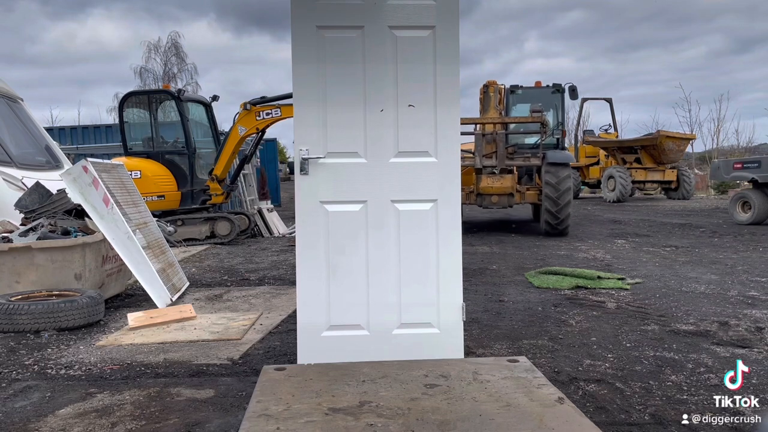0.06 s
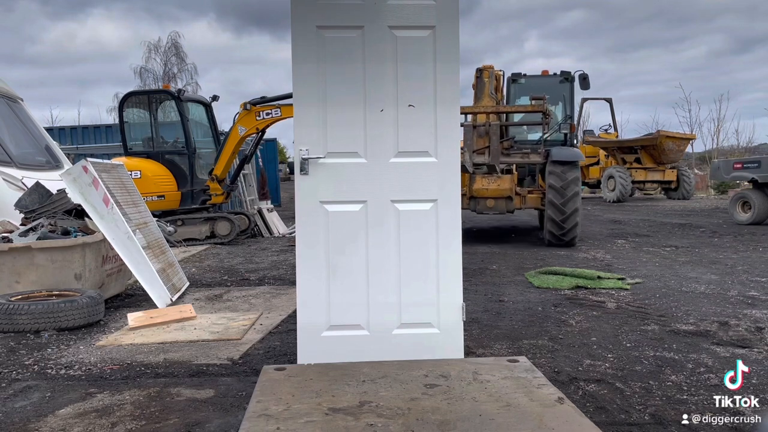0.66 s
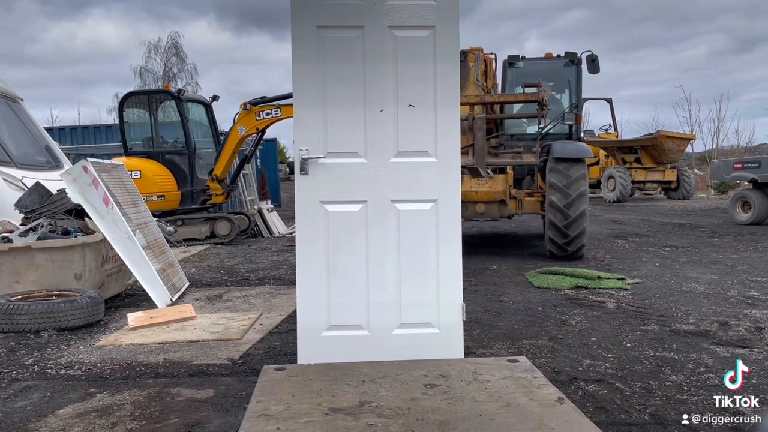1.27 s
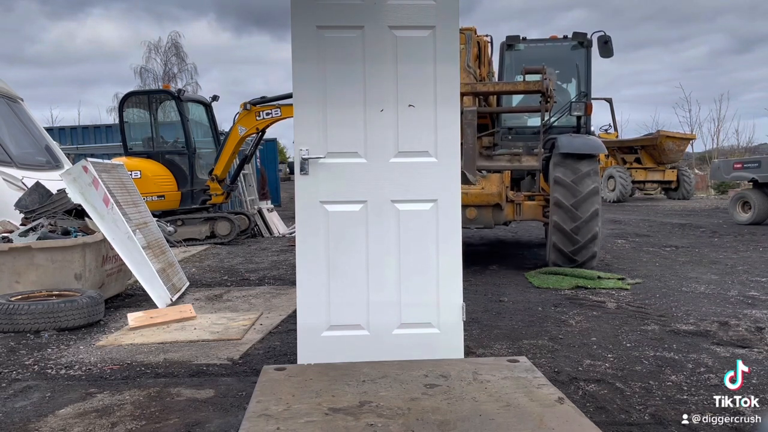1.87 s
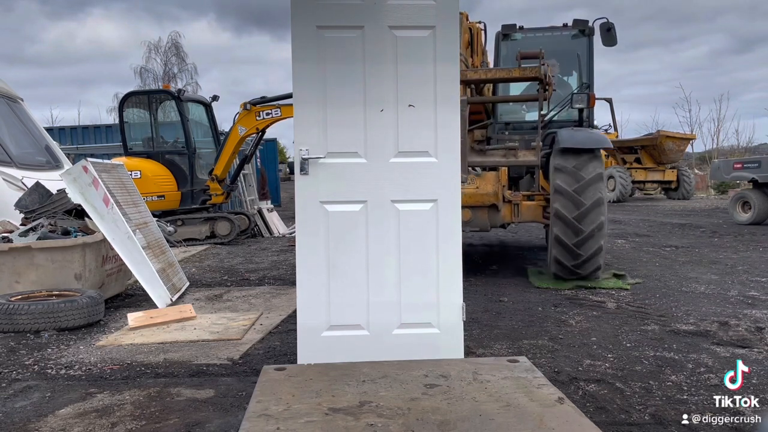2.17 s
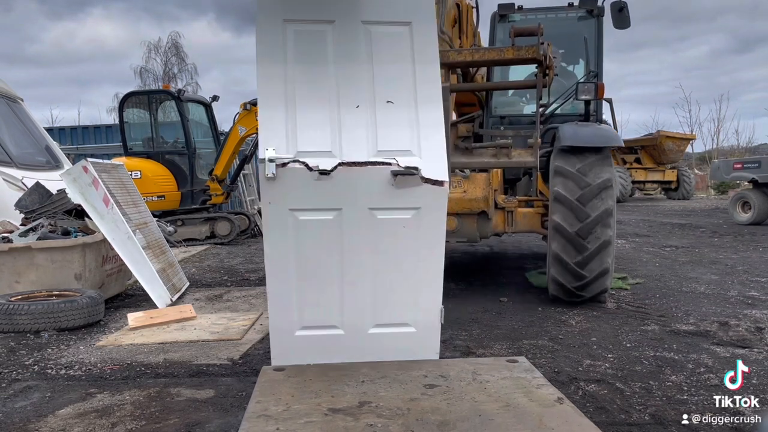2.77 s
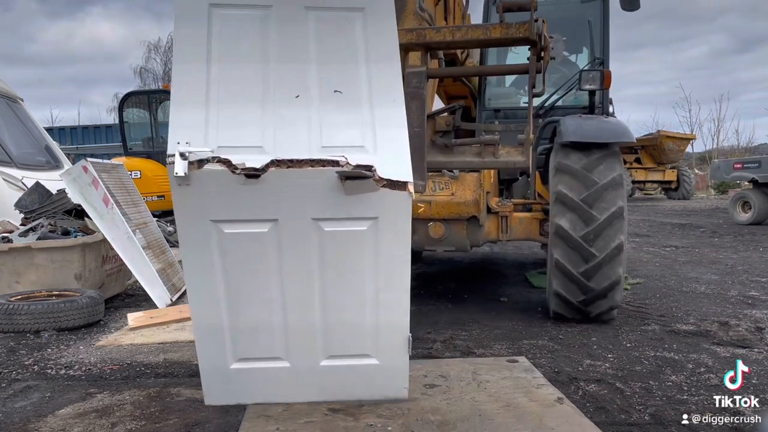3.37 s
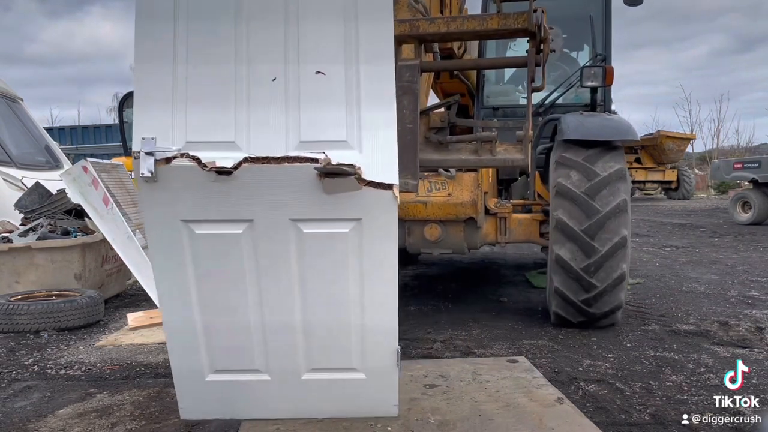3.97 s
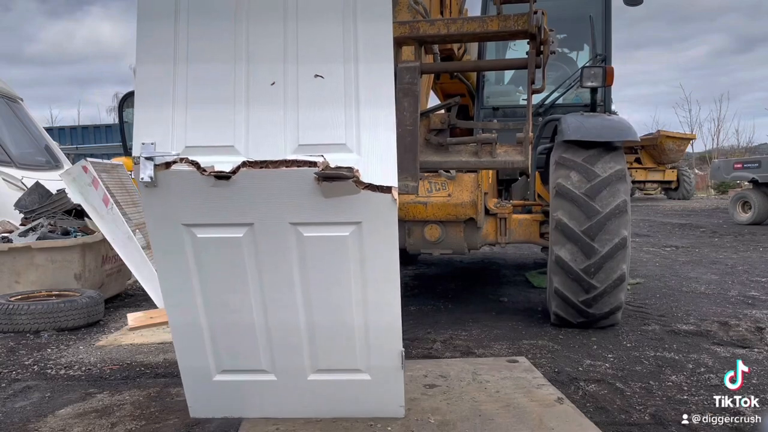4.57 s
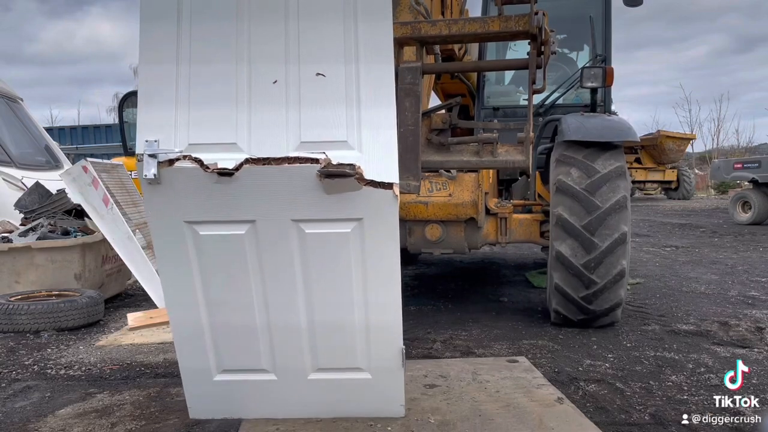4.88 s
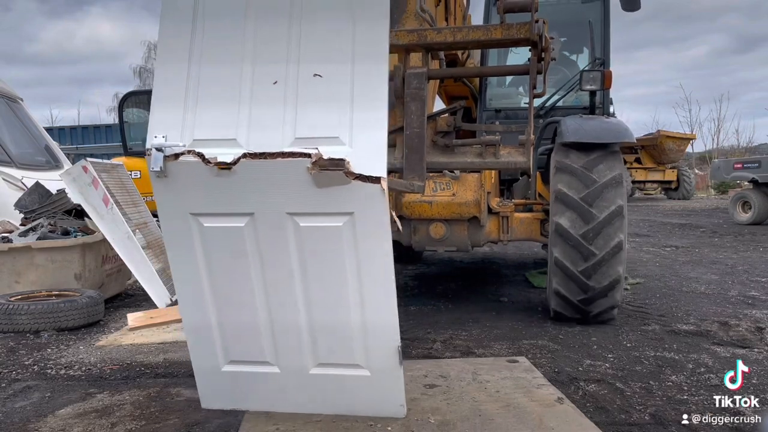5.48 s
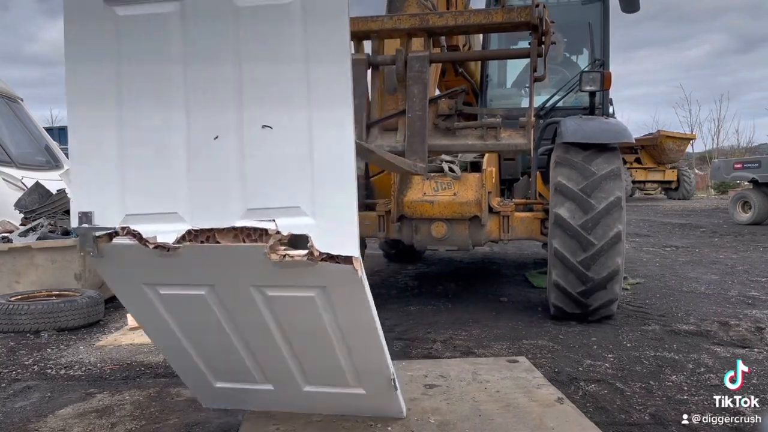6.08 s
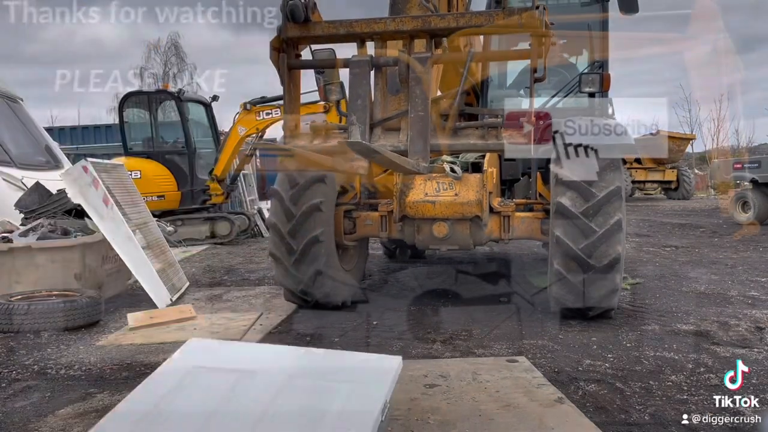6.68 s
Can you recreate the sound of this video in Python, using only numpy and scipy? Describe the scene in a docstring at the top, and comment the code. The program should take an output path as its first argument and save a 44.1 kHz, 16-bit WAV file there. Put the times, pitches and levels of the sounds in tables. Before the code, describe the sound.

A diesel loader rolls toward the microphone across a yard, growing louder, its revs rising and wavering twice with a low hum. Its loose steel forks rattle and clink from about 0.6 to 2.2 seconds. At 2.4 seconds a hollow wooden door starts to break close by, with a ragged cluster of thumps and cracks, the loudest at 2.6 seconds overloading the microphone. Splintering, crunching and further knocks run on until about 3.6 seconds as the engine sinks to an idle. The broken door drags over the ground in quieter, gritty strokes at around 3.9, 5.1 and 6.3 seconds, with ticking splinters, hollow knocks and a small metal clink near 5.8. At 6.4 seconds the door knocks and cracks again, then slams flat on a steel plate at 6.6, very loud, bouncing briefly as the plate rings. The blows leave a short outdoor echo.

```python
"""A diesel loader, revs wavering, rolls across a yard toward the microphone, its loose forks rattling.
Close by, it pushes them through a hollow wooden door: fibres crack, the skins knock, the core thumps.
While the engine idles the door hangs on the forks and drags its edge over the ground in three strokes,
then slams flat on a steel plate, which rings. Machines and sheds scatter the door's sound back,
and the loudest blows overload the microphone."""
import sys
import numpy as np
from scipy import signal
from scipy.fft import rfft, irfft, next_fast_len
from scipy.io import wavfile
from scipy.ndimage import uniform_filter1d, map_coordinates

SR = 44100
rng = np.random.default_rng(int(sys.argv[2]) if len(sys.argv) > 2 else 0)


def generate_wav(signal):
    """Clip the signal to [-1, 1] and save it as 16-bit WAV at the path in sys.argv[1]."""
    frames = np.transpose(np.atleast_2d(signal))
    scaled = np.clip(frames, -1, 1) * 32767
    pcm = np.round(scaled).astype(np.int16)
    wavfile.write(sys.argv[1], SR, pcm)


N = 297234

IDLE_HZ = 26  # firing rate
START_M, STOP_M, STOP_S = 12, 3.6, 3.47  # the loader's distance from the microphone, and when it stops
# The engine revs twice, lugs against the door, then idles. Each row: time in seconds, firing rate in Hz.
REVS = [(0.0, 40.05), (0.12, 44.8), (0.55, 46.07), (0.82, 51), (1.03, 42.9), (1.18, 40.54), (1.37, 47.08),
        (1.51, 49.94), (1.67, 47.85), (1.98, 39.5), (2.25, 32.24), (2.82, 24.37), (2.99, 23.43),
        (4.21, 21.06), (4.53, 25.31), (6.4, 26.73)]
# Short single-tone rings: the forks' loose pins and links, then, in the last row, a knock on the door.
# Each row: start in seconds, level in dB, frequency in Hz, t60 in seconds.
SHORT_RINGS = [(0.405, -66, 6196, .16), (0.587, -49, 3200, 0.14), (1.008, -43, 1940, 0.11),
               (1.331, -49, 3025, .12), (1.331, -56, 3526, 0.15), (1.49, -42, 2990, .12),
               (1.737, -36, 3200, .15), (1.778, -37, 3130, 0.11), (2.15, -42.5, 1420, 0.18),
               (3.536, -16, 1235, 0.037)]
# The hollow door's own modes. Each row: frequency in Hz, level in dB, t60 in seconds.
PANEL_MODES = [(203.5, 1.5, 0.213), (262.3, 3, 0.22), (377.6, 2.5, 0.25), (456.5, 3, 0.18),
               (497, 2.5, 0.084), (625.1, 1.5, 0.15), (753.6, -5, 0.41), (804.6, -6, .2), (887, -6, 0.3),
               (1025.6, -5.5, 0.17), (1235, -12, 0.24), (1393, -17, 0.1), (1816, -16.5, 0.18),
               (2490, -15.5, 0.28)]
# The dull groan of a rubbing edge. Each row: frequency in Hz, level in dB.
GROAN_SPECTRUM = [(65, -32.5), (120, -6), (165, 1), (215, -1.5), (330, 4), (458, -12), (587, -3),
                  (644, -17), (736, -2), (896, -16), (1300, -23.5), (1690, -56.5), (2860, -120)]
# The hanging door drags over the ground. Each row: start, attack, hold and release in seconds,
# then depth of the swell, groan level and crunch level in dB.
DRAG_STROKES = [(3.89, 0.12, 0.17, 0.38, 10, -39.5, -47), (5.079, 0.3, 0.19, 0.34, 12.5, -34, -40),
                (6.259, 0.29, 0.045, 0.018, 42, -28.5, -30.5)]


def amp(db):
    """Decibels as a gain."""
    return 10 ** (np.asarray(db) / 20)


def unit(x):
    """x scaled to rms 1."""
    return x / np.sqrt(np.mean(x ** 2) + 1e-20)


def struck(x):
    """A hit scaled to rms 1 over its first 20 ms."""
    return x / np.sqrt(np.mean(x[:880] ** 2) + 1e-20)


def along(points, hz):
    """The value at hz between (Hz, value) points, on a log axis."""
    knots_hz, values = np.transpose(points)
    return np.interp(np.log(hz + 1), np.log(knots_hz + 1), values)


def during(start, end, fade):
    """1 from start to end, fading outside; all in seconds."""
    return np.interp(np.arange(N) / SR, [start - fade, start, end, end + fade], [0, 1, 1, 0])


def wobble(rate, size=N):
    """A smooth random curve, rate knots a second."""
    knots = rng.standard_normal(int(size * rate / SR) + 4)
    return map_coordinates(knots, [np.arange(size) * rate / SR])


def filtered(x, response):
    """x times a complex response of frequency."""
    size = next_fast_len(len(x) + 8192)
    return irfft(rfft(x, size) * response(np.fft.rfftfreq(size, 1 / SR)), size)[:len(x)]


def coloured(x, spectrum, size=4096):
    """x through a causal filter with the gain of the (Hz, dB) points."""
    gain = amp(along(spectrum, np.fft.rfftfreq(size, 1 / SR)))
    cepstrum = irfft(np.log(np.maximum(gain, 1e-6)))
    fold = np.r_[1, np.full(size // 2 - 1, 2), 1, np.zeros(size // 2 - 1)]  # to minimum phase
    return signal.fftconvolve(x, irfft(np.exp(rfft(cepstrum * fold))))[:len(x)]


def resonant(x, peaks):
    """x through (Hz, width in Hz, dB) resonances of alternating sign."""
    return filtered(x, lambda f: sum((-1) ** k * amp(db) * 1j * f * width
                                     / (hz * hz - f * f + 1j * f * width)
                                     for k, (hz, width, db) in enumerate(peaks)))


def burst(t60, tail_db, tail_t60):
    """Noise that dies fast, over a slower tail."""
    t = np.arange(SR // 3) / SR
    return rng.standard_normal(len(t)) * (amp(-60 * t / t60) + amp(tail_db - 60 * t / tail_t60))


def jolt(t60, tail_db, tail_t60, edge):
    """A sudden impulse of height edge, then the rattle that it starts."""
    rattle = burst(t60, tail_db, tail_t60)
    rattle[0] += edge
    return rattle


def ring(modes, rise_s=0.0005):
    """Decaying sines from (Hz, dB, t60) modes, with a brief soft rise."""
    t = np.arange(SR // 3) / SR
    rise = 1 - np.exp(-(t / rise_s) ** 2)
    return rise * sum(amp(db - 60 * t / t60) * np.sin(2 * np.pi * (hz * t + rng.random()))
                      for hz, db, t60 in modes)


def grains(rate, spread_db):
    """Random impulses, rate a second, a few much larger than the rest."""
    sizes = amp(spread_db * np.minimum(rng.exponential(size=N), 4))
    return (rng.random(N) < rate / SR) * sizes * rng.choice([-1, 1], N)


def snaps(rate, spread_db, low_hz=900, high_hz=14000, life_cycles=1.8):
    """Tiny random snaps, rate a second, each with its own pitch and size."""
    when, pitch, chance = rng.random((int(rate * N / SR), 3)).T[:, :, None]
    hz = low_hz * (high_hz / low_hz) ** pitch
    size = hz * amp(spread_db * np.minimum(-np.log(1 - chance), 4))  # higher snaps: shorter but taller
    age = np.arange(300)
    cycles = hz * age / SR
    pings = size * np.exp(-cycles / life_cycles) * np.sin(2 * np.pi * cycles)
    positions = (when * N).astype(int) + age
    return unit(np.bincount(positions.ravel(), pings.ravel(), N)[:N])


def add(track, start, sound):
    """Mix a sound in at start seconds."""
    part = track[round(start * SR):][:len(sound)]
    part += sound[:len(part)]


def nearness_db():
    """The loader grows louder as it nears the microphone at an even pace; 0 dB where it stops."""
    distance_m = np.interp(np.arange(N) / SR, [0, STOP_S], [START_M, STOP_M])
    return 20 * np.log10(STOP_M / distance_m)


def engine():
    """Exhaust tones, roar and clatter follow revs, throttle and distance, over a steady low rumble."""
    # Exhaust orders 1 to 3. Each row: dB at idle, dB per octave of revs, dB added at full throttle.
    exhaust_orders = [(-36, 4, -3.5), (-43.5, 15, 3.5), (-40.5, 4, 0.5)]
    # The pump's faint whine. Each row: multiple of the firing rate, level in dB against the roar.
    pump_tones = [(10, -11), (15, -8)]
    # Combustion, its low roar and its hard clatter. Each row: frequency in Hz, level in dB.
    roar_spectrum = [(65, -31.5), (110, -2.5), (177, -7.5), (211, -8.5), (244, -9), (360, -11.5),
                     (450, -10), (560, -13), (645, -16), (780, -19.5), (963, -26), (1050, -15),
                     (1300, -42.5), (1690, -43), (2860, -120)]
    clatter_spectrum = [(530, -18), (900, -1.5), (1000, -7), (1080, -7.5), (1490, -6.5), (1770, -8),
                        (3000, -16.5), (3730, -23.5), (5480, -33), (7060, -40.5), (9420, -45.5),
                        (16000, -54)]
    firing_hz = np.interp(np.arange(N) / SR, *np.transpose(REVS))
    phase = 2 * np.pi * np.cumsum(firing_hz) / SR
    octaves = np.log2(firing_hz / IDLE_HZ)
    throttle = np.tanh(uniform_filter1d(np.gradient(octaves) * SR, SR // 8))  # positive as revs climb

    def gain(idle_db, octave_db, throttle_db):
        return amp(idle_db + octave_db * octaves + throttle_db * throttle)

    exhaust = sum(gain(*row) * amp(wobble(14)) * np.sqrt(2) * np.sin(k * phase + 2 * np.pi * rng.random())
                  for k, row in enumerate(exhaust_orders, 1))
    whine = sum(amp(db + 3 * wobble(25)) * np.sin(k * phase + 0.6 * wobble(40)) for k, db in pump_tones)
    firings = unit(amp(3.6 * (IDLE_HZ / firing_hz) ** 2 * np.cos(phase)))  # they merge as the revs rise
    puffs = rng.standard_normal(N) * amp(2.5 * np.cos(phase) + 2 * wobble(45))
    roar = unit(coloured(puffs, roar_spectrum))
    clatter = unit(coloured(rng.standard_normal(N), clatter_spectrum)) * firings
    rumble_spectrum = [(15, -22.5), (45, -5), (130, -6.5), (300, -26), (900, -74)]
    rumble = unit(coloured(rng.standard_normal(N), rumble_spectrum))
    combustion = gain(-42, 13, -0.5) * (roar + whine) + gain(-51.5, 12, 1.8) * clatter
    return amp(nearness_db()) * (exhaust + combustion) + amp(-45) * rumble


def drive_train(ratio=4.64, lag_s=0.079, inertia_s=0.075, swell_lag_s=0.052, db_per_octave=18):
    """A hum follows the revs a little late, louder when faster, and dies as the door slows the loader."""
    t = np.arange(N) / SR
    late_hz = np.interp(t - lag_s, *np.transpose(REVS))
    speed_hz = uniform_filter1d(late_hz, size=round(inertia_s * SR))
    phase = 2 * np.pi * np.cumsum(ratio * speed_hz * (1 + 0.005 * wobble(29))) / SR
    hum = np.sin(phase) + amp(-17) * np.sin(2 * phase) + amp(-21) * np.sin(3 * phase)
    octaves = np.log2(np.interp(t - swell_lag_s, t, speed_hz) / IDLE_HZ)  # loudness trails pitch
    level_db = -45 + db_per_octave * octaves + nearness_db() + 1.8 * wobble(28)
    return unit(hum) * amp(level_db) * during(0, 1.95, fade=0.75)


def hydraulics(flutter_db=3.5, lift_s=2.6):
    """Oil whistles through a valve; each tone flutters on its own inside a skirt of hiss."""
    # The valve's tones. Each row: frequency in Hz, width in Hz, relative level in dB.
    valve_tones = [(4670, 85, 2.5), (5430, 54, 3), (5760, 70, -6.5), (8100, 90, -15)]
    whistle = np.zeros(N)
    for hz, width, db in valve_tones:
        hiss = resonant(rng.standard_normal(N), [(hz, 2 * width, db)])
        tone = resonant(hiss, [(hz, width, 0)])
        whistle += (tone + amp(-5) * hiss) * amp(flutter_db * wobble(34))
    lift_db = np.interp(np.arange(N) / SR, [lift_s, lift_s + 0.5], [0, 0.5])  # the boom starts to lift
    return unit(whistle) * amp(-67.5 + lift_db + nearness_db())


def tyres():
    """Stones tick under the tyres until the loader stops."""
    # The yard's gravel. Each row: frequency in Hz, level in dB.
    gravel_spectrum = [(1000, 11.5), (3000, 4.5), (6000, -12.5), (9500, -14.5), (12500, -33)]
    stones = unit(coloured(snaps(rate=45, spread_db=3.3), gravel_spectrum))
    return amp(-68) * stones * during(0, STOP_S, fade=0.2)


def forks():
    """Loose steel chatters over the bumps, each time with another mix of its modes, and pins clink."""
    # The forks rattle on their carriage. Each row: start in seconds, level in dB, relative tail in dB.
    rattles = [(0.584, -44, 11), (1.002, -47, -4), (1.329, -45.5, 0), (1.488, -37.5, 13), (1.512, -45.5, 6),
               (1.668, -47.5, 0), (1.735, -33, 18), (1.775, -34.5, 6), (1.792, -37.5, 9), (1.812, -51, 1),
               (2.149, -49, 6)]
    # The forks' modes. Each row: frequency in Hz, width in Hz, level in dB.
    fork_modes = [(487, 110, 2.5), (750, 105, 5.5), (1100, 210, 0), (1420, 180, 7), (1770, 130, 5.5),
                  (2410, 480, -2.5), (3280, 190, -3), (3770, 64, -11), (4500, 670, -15.5), (6333, 150, -35)]
    out = np.zeros(N)
    for start, db, tail_db in rattles:
        modes = [(hz, width, level + rng.normal(0, 3)) for hz, width, level in fork_modes]
        chatter = burst(t60=0.035, tail_db=tail_db, tail_t60=0.24)
        add(out, start, amp(db) * struck(resonant(chatter, modes)))
    for start, db, hz, t60 in SHORT_RINGS[:-1]:
        add(out, start, ring([(hz, db, t60)]))
    return out


def door_blows():
    """Fibres snap in a ragged cluster, the skin knocks and rings, and the hollow core thumps."""
    # Each row: start in seconds, then thump level, knock level, crack level and crack treble in dB.
    blows = [(2.388, -19.5, -24.5, -43, -2), (2.423, -19, -23.5, -27.5, -8), (2.46, -16, -25, -32.5, 9),
             (2.467, -14, -13.5, -19, -4), (2.495, -11, -16.5, -33, 3), (2.526, -13, -15, -26.5, -6.5),
             (2.55, -10, -12.5, -18.5, 3), (2.588, -10, -5.5, -11, 2), (2.618, -16.5, -19, -45, 0),
             (2.647, -41, -32, -28, -9), (2.673, -35, -44, -26, -5), (2.762, -30.5, -20.5, -32.5, 2),
             (2.789, -52, -26, -29, -2), (2.805, -45, -26, -33.5, 8), (2.831, -30, -23.5, -20.5, 0.5),
             (2.919, -19.5, -21, -22.5, 0.5), (2.982, -29, -26.5, -34, 6), (3.155, -34, -27, -28, -1.5),
             (3.191, -17.5, -20, -37, 4), (3.197, -31, -22, -34, -7), (3.265, -18, -23.5, -45, -13),
             (3.535, -18, -20.5, -36, -13), (3.766, -40, -34.5, -48, -12), (4.041, -47, -31.5, -52, -5),
             (4.958, -35.5, -51, -59, -10), (5.201, -23.5, -28.5, -50, 0), (5.231, -41, -32.5, -50, -8),
             (5.441, -26.5, -34, -50, -17), (5.512, -36, -31, -42, -19), (5.551, -40, -31.5, -40, -21),
             (5.723, -44.5, -31.5, -37, -26), (6.424, -17.5, -28, -40.5, -4), (6.463, -27, -39, -34.5, -1),
             (6.472, -10.5, -16.5, -25.5, 10), (6.524, -21, -22.5, -31.5, 11.5), (6.55, -45, -32, -33, 6),
             (6.603, -8, -4, -15, 7.5)]
    # The core's thump, the skin's knock, the fibres' crack. Each row: frequency in Hz, level in dB.
    thump_spectrum = [(21, -34), (35, -9), (85, -1), (160, -10), (235, -4), (420, -17.5), (550, -41),
                      (920, -120)]
    knock_spectrum = [(180, -26), (300, 1.5), (499, -4.5), (544, -3.5), (638, -8.5), (676, -5.5), (727, -4),
                      (885, -8), (931, -7.5), (1010, -8.5), (1700, -15), (2210, -50.5), (3740, -120)]
    crack_spectrum = [(700, -26), (1300, -0.5), (1900, 7.5), (2700, 1), (3600, -2.5), (4900, -9),
                      (6300, -12.5), (8000, -19), (10000, -22), (13000, -32.5), (16000, -36)]
    out = np.zeros(N)
    for start, thump_db, knock_db, crack_db, treble_db in blows:
        thump = struck(coloured(jolt(t60=0.099, tail_db=-8, tail_t60=0.22, edge=4.2), thump_spectrum))
        knock = struck(coloured(jolt(t60=0.054, tail_db=-8, tail_t60=0.19, edge=8.7), knock_spectrum))
        fibres = burst(t60=0.022, tail_db=-12, tail_t60=0.1)
        ragged = fibres * amp(3.5 * wobble(900, size=len(fibres)))
        crack = struck(coloured(coloured(ragged, crack_spectrum), [(3000, 0), (10000, treble_db)]))
        panel = struck(ring([(hz, db + rng.normal(0, 3), t60) for hz, db, t60 in PANEL_MODES]))
        skin = amp(-1) * knock + amp(-6) * panel
        add(out, start, amp(thump_db) * thump + amp(knock_db) * skin + amp(crack_db) * crack)
    return out


def air_pushes():
    """The panel flexes as a whole and shoves a few heavy pressure cycles at the microphone."""
    # Each row: start in seconds, level in dB, frequency in Hz, t60 in seconds.
    pushes = [(2.388, -6.5, 68.6, 0.19), (2.583, 18, 221.6, 0.014), (3.221, -8.5, 92.6, 0.12),
              (6.474, -6.5, 40.4, 0.23), (6.604, 19.5, 163, 0.026), (6.701, -22.5, 84.8, .35)]
    out, t = np.zeros(N), np.arange(SR // 4) / SR
    for start, db, hz, t60 in pushes:
        add(out, start, amp(db - 60 * t / t60) * np.sin(2 * np.pi * hz * t))
    return out


def friction(groan_spectrum, crunch_spectrum, slip_db, rate, spread_db):
    """Uneven slips ring the hollow panel and snap fibres: (groan, crunch), each of rms 1."""
    slips = amp(slip_db * wobble(55))
    shakes = unit(grains(rate=500, spread_db=2) * slips) + 0.66 * slips * rng.standard_normal(N)
    peaks = [(hz, np.log(1000) / np.pi / t60, db) for hz, db, t60 in PANEL_MODES]
    hollow = unit(resonant(shakes, peaks))
    groan = unit(unit(coloured(shakes, groan_spectrum)) + amp(-1) * hollow)
    fibres = snaps(rate, spread_db) + 0.6 * rng.standard_normal(N)
    return groan, unit(coloured(slips * fibres, crunch_spectrum))


def pushed(push, groan, crunch):
    """One push of wood against resistance: groan and crunch build, hold, ease off and stop together."""
    start, attack, hold, release, depth_db, groan_db, crunch_db = push
    knots = start + np.cumsum([0, attack, hold, release])
    swell_db = np.interp(np.arange(N) / SR, knots, [-depth_db, 0, 0, -depth_db])
    force = amp(swell_db) * during(start, knots[-1], fade=0.013)
    return force * (amp(groan_db) * groan + amp(crunch_db) * crunch)


def splintering():
    """The break runs on through the skins and the core."""
    # Each row: start, attack, hold and release in seconds, then swell depth, groan and crunch in dB.
    splits = [(2.397, 0.058, 0.21, 0.1, 12.5, -20, -30), (2.622, 0.029, 0.324, 0.204, -1.5, -29.5, -39.5),
              (3.129, 0.068, 0.22, 0.32, 11.5, -28.5, -40)]
    # The skins' groan and the fibres' crunch. Each row: frequency in Hz, level in dB.
    skin_spectrum = [(65, -38), (110, 2.5), (232, 0.5), (263, 6.5), (336, 1), (382, -6.5), (421, -17),
                     (458, -1.5), (561, -7), (617, -8.5), (679, -9.5), (1030, -15), (1400, -26),
                     (1820, -48), (3080, -120)]
    fibre_spectrum = [(590, -31.5), (1000, 5), (1100, -6), (1650, -6), (1940, -12.5), (2360, -13.5),
                      (3540, -19), (7190, -34.5), (15100, -48.5), (16000, -46)]
    return sum(pushed(split, *friction(skin_spectrum, fibre_spectrum, slip_db=1.7, rate=1800, spread_db=2))
               for split in splits)


def ticks(grit_per_s=9):
    """Splinters let go in short rasps as the door breaks; later, stones and grit tick under the dragging edge,
    some at random in each stroke."""
    # Single ticks: splinters as the door breaks, then grit and stones under the dragging edge. Each row: start
    # in seconds, level in dB.
    single_ticks = [(2.435, -35), (2.64, -35), (2.681, -33), (2.708, -38), (2.724, -36), (2.972, -58),
                    (3.028, -53), (3.217, -33.5), (3.696, -49), (3.9, -47), (3.94, -44.5), (3.981, -43),
                    (4.028, -42), (4.123, -44), (4.141, -43), (4.2, -44), (4.295, -56), (4.396, -44.5),
                    (4.416, -54.5), (4.979, -40), (5.093, -37), (5.125, -45), (5.434, -52), (5.615, -41),
                    (5.684, -49), (6.303, -45.5), (6.362, -49)]
    # The colour of splinters and grit alike. Each row: frequency in Hz, level in dB.
    tick_spectrum = [(900, 13), (2600, 5.5), (4000, -1), (6000, -8.5), (9500, -13.5), (12000, -23),
                     (16000, -25)]
    out, pops = np.zeros(N), []
    for start, attack, hold, release, *_ in DRAG_STROKES:
        length = attack + hold + release
        for when, size in rng.random((int(grit_per_s * length), 2)):
            pops.append((start + length * when, -60 + 6 * size))
    for start, db in single_ticks + pops:
        rasp = burst(t60=0.025, tail_db=-14, tail_t60=0.12)
        add(out, start, amp(db) * struck(coloured(rasp, tick_spectrum)))
    return out


def scuffs(attack_s=0.003, t60=0.12):
    """A broken or dragging edge catches: each time a short run of gritty slips that dies away."""
    # Each row: start in seconds, length in seconds, groan level in dB, crunch level in dB.
    catches = [(2.476, .035, -21.5, -30), (2.546, .02, -17, -24.5), (2.582, 0.04, -14, -22.5),
               (2.866, 0.069, -20, -38.5), (3.135, .025, -31, -43), (3.263, 0.088, -25, -42.5),
               (3.607, 0.029, -40.5, -48), (3.756, 0.05, -31, -43), (3.837, 0.024, -40, -46.5),
               (3.959, 0.033, -42, -42.5), (4.011, .04, -34, -45), (4.104, 0.032, -34, -46),
               (4.136, 0.0084, -35, -32), (4.173, 0.051, -31.5, -41.5), (4.288, 0.022, -38.5, -45.5),
               (4.395, 0.021, -36, -46), (4.846, 0.013, -37, -49), (5.02, 0.056, -42, -48),
               (5.119, 0.02, -30.5, -39.5), (5.223, 0.0095, -39, -40.5), (5.273, 0.032, -31, -41),
               (5.395, 0.06, -34, -40), (5.514, 0.039, -30, -33), (5.618, 0.042, -31.5, -41),
               (5.72, 0.015, -36, -37), (6.26, 0.079, -36.5, -49), (6.378, 0.009, -33.5, -49)]
    # The edge's rasp, and stones and splinters crackling under it. Each row: frequency in Hz, level in dB.
    rasp_spectrum = [(550, -17.5), (950, 1), (1400, 2.5), (2400, -5), (3400, -14.5), (5000, -23.5),
                     (7500, -48), (16000, -65.5)]
    crackle_spectrum = [(1500, 6.5), (3000, 11.5), (5000, -3.5), (7500, -10), (10000, -13), (12500, -21),
                        (16000, -32)]
    groan, rasp = friction(GROAN_SPECTRUM, rasp_spectrum, slip_db=2, rate=1200, spread_db=2)
    crackle = unit(coloured(grains(rate=700, spread_db=2.3), crackle_spectrum))
    crunch = rasp + amp(-11) * crackle
    out, t = np.zeros(N), np.arange(N) / SR
    for start, length, groan_db, crunch_db in catches:
        rise = np.clip((t - start) / attack_s, 0, 1)
        decay = amp(-60 * np.clip((t - start - length) / t60, 0, 2))
        out += rise * decay * (amp(groan_db) * groan + amp(crunch_db) * crunch)
    return out


def bright_cracks():
    """The two hardest blows open with a bright crack: the stile gives way, the panel slaps the plate."""
    # Each row: start in seconds, level in dB, t60 in seconds.
    cracks = [(2.578, -2.5, 0.032), (6.602, -18.5, 0.061)]
    # The colour of both cracks. Each row: frequency in Hz, level in dB.
    crack_spectrum = [(500, -5.5), (1200, 9), (1900, 2.5), (2700, 9.5), (4500, -17), (8000, -9),
                      (11000, -20.5), (16000, -33.5)]
    out = np.zeros(N)
    for start, db, t60 in cracks:
        add(out, start, amp(db) * struck(coloured(burst(t60, tail_db=-45, tail_t60=0.1), crack_spectrum)))
    return out


def knock_ring():
    """One knock on the hollow door rings briefly near 1.2 kHz."""
    start, db, hz, t60 = SHORT_RINGS[-1]
    out = np.zeros(N)
    add(out, start, ring([(hz, db, t60)]))
    return out


def scraping():
    """The door's bottom edge drags over boards and gravel in three strokes."""
    # The crunch, one spectrum for each stroke. Each row: frequency in Hz, level in dB.
    crunch_spectra = [
        [(590, -18), (1000, 9), (1230, -12), (1630, -1), (2010, -13.5), (2390, -12), (2590, -4), (3340, -15),
         (4730, -11.5), (7190, -25.5), (9060, -27), (12400, -47.5), (16000, -53)],
        [(590, -27), (1000, -3), (1200, -3), (1430, 0.5), (1810, -11), (2330, -11.5), (3800, -21), (4120, -32),
         (4620, -25), (7350, -38), (9490, -42), (16000, -57)],
        [(590, -34), (1000, 0.5), (1790, -5), (2280, -7), (3670, -13), (5070, -18), (5570, -23), (15100, -44),
         (16000, -55)],
    ]
    return sum(pushed(stroke, *friction(GROAN_SPECTRUM, spectrum, slip_db=3.8, rate=1500, spread_db=2.3))
               for stroke, spectrum in zip(DRAG_STROKES, crunch_spectra))


def fitting_clink(start=5.783):
    """A small metal fitting ticks on contact and rings briefly."""
    # Its modes. Each row: frequency in Hz, level in dB, t60 in seconds.
    fitting_modes = [(5286, -3, 0.067), (5230, 8, 0.015), (9360, -8, 0.0058)]
    # The bright tick of its contact. Each row: frequency in Hz, level in dB.
    tick_spectrum = [(3000, -30), (5000, 7.5), (7500, -13), (9500, 1.5), (13000, -4), (16000, -14)]
    out = np.zeros(N)
    metal = ring(fitting_modes)
    tick = struck(coloured(burst(t60=0.011, tail_db=-22, tail_t60=0.1), tick_spectrum))
    add(out, start, amp(-39.5) * (metal + amp(-13) * tick))
    return out


def landing(slam_s=6.611, shimmer_t60=0.6):
    """The door falls flat on a steel plate, sets it ringing, and bounces."""
    # The fallen door's crowd of close, short modes. Each row: frequency in Hz, level in dB.
    board_spectrum = [(70, -5), (125, -8), (200, 8), (340, 3), (700, 1.5), (1350, -3), (1700, -15),
                      (2200, -12.5), (2800, -25), (4400, -25.5), (5200, -42), (6700, -32), (9000, -47),
                      (16000, -55)]
    # The plate's low modes. Each row: frequency in Hz, level in dB, t60 in seconds.
    plate_modes = [(191, -8, 0.84), (259.2, -6, 0.53), (332, -12.5, 0.82), (375, -18, 0.3),
                   (464, -24, 0.13), (495.5, 0.5, 0.21), (641, 1, 0.11), (746, 0, 0.18), (910, -14, 0.32),
                   (1052, -10, 0.53), (1141, -22, 0.45), (1240, -15, 0.6), (1297, -17, 0.62),
                   (1440, -16.5, 0.58), (2030, -26, .45), (2240, -32, .5), (2550, -39, 0.43)]
    # The door's bounces. Each row: start in seconds, level in dB.
    bounces = [(6.624, -8.5), (6.652, -22), (6.677, -18), (6.692, -28), (6.71, -32), (6.727, -33)]
    out = np.zeros(N)
    clatter = struck(coloured(burst(t60=0.14, tail_db=-10, tail_t60=0.36), board_spectrum))
    plate = ring(plate_modes)
    plate *= amp(1.1 * wobble(120, size=len(plate)))  # the door chatters on the plate
    high_hz = np.geomspace(1750, 11000, 70) * (1 + 0.012 * rng.standard_normal(70))  # its high modes
    high_db = along(board_spectrum, high_hz) + 10 * np.log10(high_hz) + rng.normal(0, 4, 70)
    shimmer = struck(ring([(hz, db, shimmer_t60) for hz, db in zip(high_hz, high_db)]))
    add(out, slam_s, amp(-5) * plate + amp(-9.5) * clatter + amp(-25) * shimmer)
    for start, db in bounces:
        bounce = jolt(t60=0.065, tail_db=-13, tail_t60=0.15, edge=6.8)
        add(out, start, amp(db) * struck(coloured(bounce, board_spectrum)))
    return out


def yard(x):
    """Machines and sheds scatter the sound back to the microphone in a short tail."""
    # The yard's decay. Each row: frequency in Hz, t60 in seconds.
    decay_times = [(100, 0.51), (600, 0.28), (3000, 0.3), (12000, 0.5)]
    hz, t, noise = signal.stft(rng.standard_normal(SR), SR, nperseg=256)
    decay = amp(-60 * t / along(decay_times, hz)[:, None])
    tail = signal.istft(noise * decay, SR, nperseg=256)[1]
    gap = np.zeros(SR // 60)  # before the first reflection
    return signal.fftconvolve(x, np.r_[gap, tail / np.linalg.norm(tail)])[:N]


def scene():
    """One microphone in the yard: the door stands close to it, the loader behind the door."""
    door = door_blows() + ticks() + splintering() + scraping() + scuffs() + fitting_clink() + landing()
    loader = engine() + drive_train() + hydraulics() + forks()
    direct_only = knock_ring() + tyres() + bright_cracks() + air_pushes()
    return (loader + door + direct_only + amp(-13) * yard(door))[None]


def record(dry, top_hz=16000):
    """The microphone saturates at full scale and keeps nothing above its band limit."""
    clipped = dry[0] / (1 + np.abs(dry[0]) ** 6) ** (1 / 6)
    return filtered(clipped, lambda hz: 1 / np.sqrt(1 + (hz / top_hz) ** 120))[None]


dry = scene()
out = record(dry)
generate_wav(out)
```